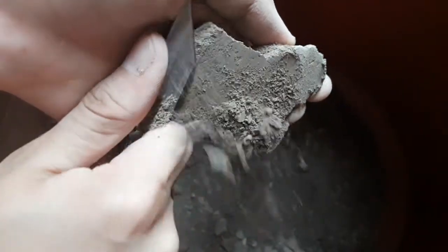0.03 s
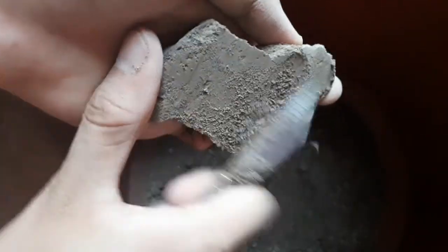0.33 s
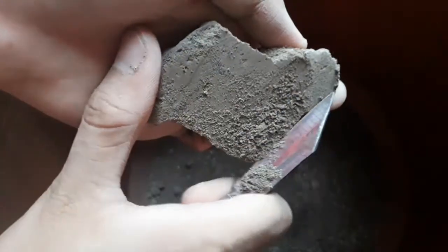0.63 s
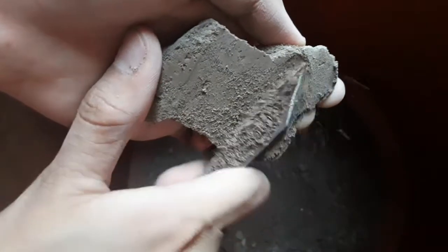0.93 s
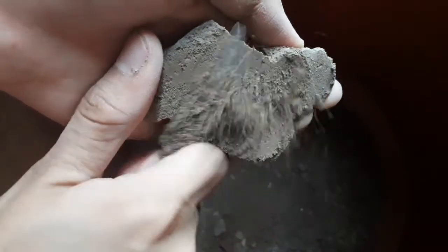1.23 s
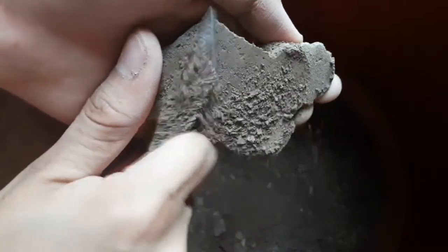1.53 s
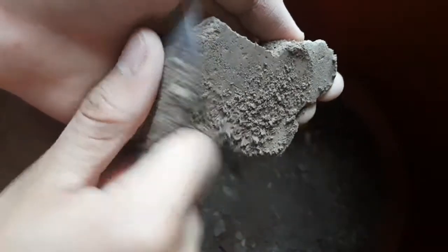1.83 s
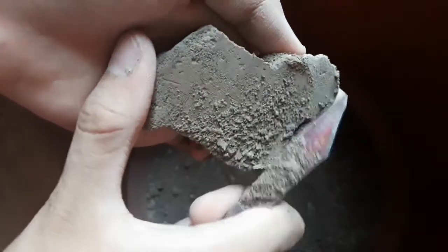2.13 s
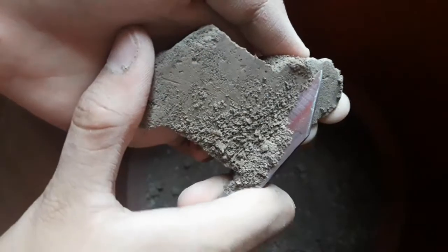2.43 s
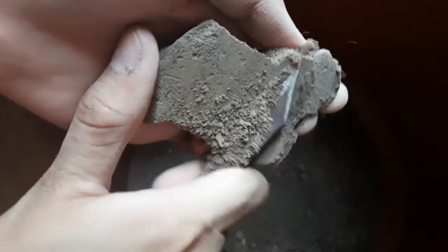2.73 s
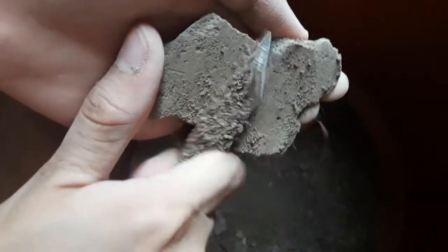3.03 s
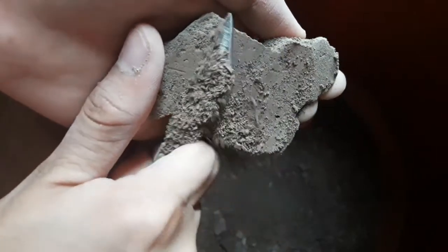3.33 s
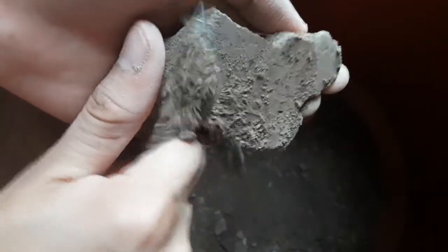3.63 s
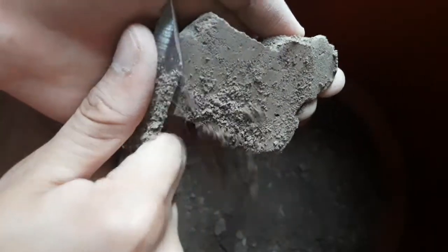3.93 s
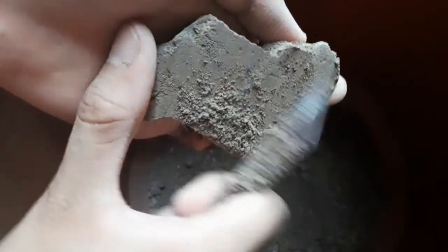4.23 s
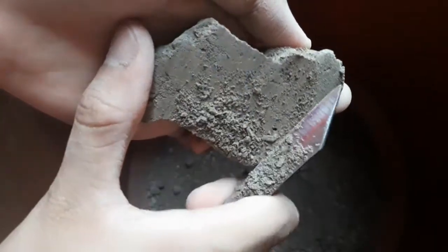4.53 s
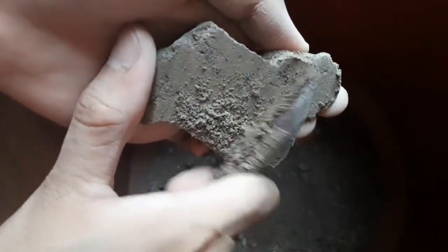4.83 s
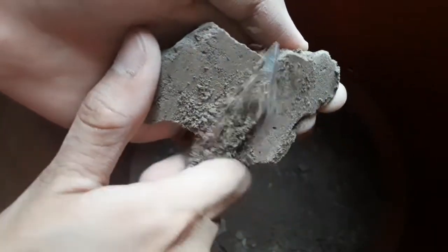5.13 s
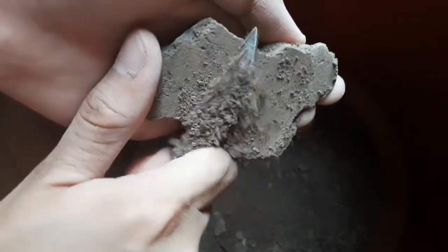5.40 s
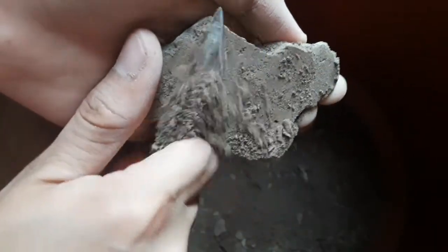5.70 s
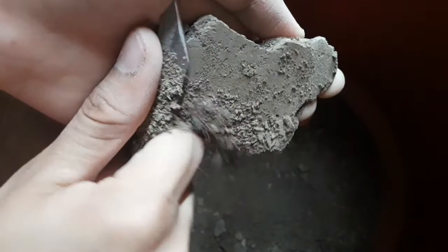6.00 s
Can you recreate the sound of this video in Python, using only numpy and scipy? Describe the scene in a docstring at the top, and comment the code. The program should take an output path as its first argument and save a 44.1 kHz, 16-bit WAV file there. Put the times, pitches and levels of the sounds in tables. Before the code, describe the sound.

A small steel blade works on a crumbly chunk of sand, heard close in a quiet room. At about 0.3 seconds the flat of the blade brushes across it, and lumps land in a bowl with crunchy thuds and a brief ring, loudest around 0.4 to 0.5 seconds. The first scraping stroke runs from about 0.6 to 1.7 seconds: short, gritty, hissing pushes with sharp bursts as the edge catches and slips, the steel ringing lightly in the later part. After a lull with one short scrape, a second stroke runs from 2.6 to 3.8 seconds, with crumbs rattling into the bowl near 3.2 seconds. A faint brush and soft hand bumps follow just after 4 seconds. The third stroke stutters from about 4.7 to 6 seconds. Throughout, the hands give a soft, low rumble and loose sand patters faintly into the bowl.

```python
"""Shaving a chunk of sand

A small steel blade shaves a crumbly chunk of sand, held in the hand over a bowl in a quiet room.
Three strokes advance in short pushes, shearing off countless grains that hiss and set the blade
ringing. The edge catches and slips in bursts, and between strokes the flat of the blade brushes back.
The hands rumble softly, and loose crumbs and lumps drop into the bowl below."""
import sys
import numpy as np
from scipy import signal
from scipy.fft import rfft, irfft, next_fast_len
from scipy.io import wavfile
from scipy.ndimage import uniform_filter1d

SR = 44100
rng = np.random.default_rng(int(sys.argv[2]) if len(sys.argv) > 2 else 0)


def inscribe(sig):
    """Save sig as 16-bit PCM at rate SR to the path in sys.argv[1].

    A 1-D sig is mono; a 2-D sig holds one channel per row.
    Samples are clipped to [-1, 1] before scaling.
    """
    pcm = np.round(np.clip(np.atleast_2d(sig).T, -1, 1) * 32767)
    wavfile.write(sys.argv[1], SR, pcm.astype(np.int16))


N = 271656
T = np.arange(N) / SR
FFT_SIZE = next_fast_len(N + SR // 2)
FREQS = np.arange(FFT_SIZE // 2 + 1) * SR / FFT_SIZE

# the flat of the blade brushes back (start [s], length [s], first level [dB], last level [dB])
BACK_BRUSHES = [(0.0, 0.078, -47.5, -53), (0.226, 0.051, -27, -30.5), (0.31, 0.043, -29.5, -27.5),
                (1.893, 0.01, -37, -39.5), (4.062, 0.025, -32, -29), (4.17, 0.018, -56, -43.5),
                (6.137, 0.012, -40.5, -42)]
# the edge breaks through a hard spot (time [s], level [dB], rise [s], fall [s])
EDGE_SLIPS = [(0.359, -17.5, 0.0044, 0.0041), (0.859, -12, 0.0049, 0.0083), (1.0582, -19.5, 0.006, 0.0069),
              (1.1646, -19, 0.0042, 0.017), (1.5077, -16, 0.0022, 0.0081), (1.648, -16.5, 0.0023, 0.02),
              (2.599, -27, 0.0078, 0.0096), (2.8476, -11.5, 0.0049, 0.01), (3.0237, -15, 0.0057, 0.014),
              (3.116, -17, 0.007, 0.01), (3.2312, -15, 0.0047, 0.0096), (3.4018, -17, 0.0053, 0.0043),
              (3.4732, -12.5, 0.0016, 0.0072), (3.6815, -24, 0.002, 0.012), (4.673, -29.5, 0.0086, 0.0033),
              (4.8245, -15, 0.012, 0.0086), (4.911, -14.5, 0.0026, 0.0083), (5.0316, -20.5, 0.009, 0.0084),
              (5.151, -15.5, 0.0033, 0.012), (5.3316, -13.5, 0.0021, 0.0056), (5.4532, -20, 0.005, 0.0049),
              (5.5435, -26, 0.0012, 0.0064), (5.6355, -14, 0.005, 0.013), (5.859, -16, 0.0023, 0.0087)]
# the blade crosses the chunk from its far edge to the thumb (start [s], end [s])
BLADE_STROKES = [(0.55, 1.74), (2.5, 3.54), (4.48, 6.0)]
# short pushes of the blade (start [s], length [s], first level [dB], last level [dB], brightness [dB])
BLADE_PUSHES = [(0.576, 0.033, -41.5, -40.5, 0.5), (0.764, 0.052, -27, -21, 1.5),
                (0.927, 0.059, -25, -23.5, 3.5), (1.107, 0.025, -33.5, -34.5, -0.5),
                (1.161, 0.08, -36, -17, 1.5), (1.281, 0.16, -18.5, -40, 3), (1.513, 0.1, -26.5, -29, 1.5),
                (1.654, 0.063, -21.5, -38, -1), (2.248, 0.069, -44.5, -48, 3),
                (2.332, 0.06, -26, -29.5, -0.5), (2.636, 0.043, -37, -25.5, 5),
                (2.685, 0.081, -27, -25.5, 5.5), (2.78, 0.067, -50, -25.5, -1),
                (2.864, 0.094, -28.5, -33.5, 0.5), (3.038, 0.04, -38, -29, 3.5),
                (3.126, 0.054, -32.5, -22, 0.5), (3.234, 0.052, -26.5, -22.5, 0.5),
                (3.418, 0.23, -31.5, -42.5, -1.5), (3.692, 0.07, -18.5, -17, -4),
                (3.83, 0.09, -39, -34.5, -4.5), (4.489, 0.058, -51.5, -40.5, -1.5),
                (4.695, 0.062, -35, -21, 2.5), (4.864, 0.065, -30.5, -18.5, 3.5),
                (5.047, 0.092, -38, -39.5, 3.5), (5.151, 0.097, -27.5, -33, 1),
                (5.32, 0.008, -40, -35, 3.5), (5.345, 0.039, -24, -31, 1), (5.458, 0.015, -27, -29, 3),
                (5.565, 0.063, -47.5, -29, 3), (5.638, 0.097, -22, -22, 2.5), (5.79, 0.034, -37, -31, -3),
                (5.871, 0.052, -24.5, -25.5, 2)]
# the blade rings more near the thumb (share of the stroke [0-1], ring compared with hiss [dB])
STROKE_RING = [(0, -31), (0.3, -28), (0.56, -5.5), (0.72, -11), (1, -3)]
# the notes the steel rings at (pitch [Hz], width [Hz], level [dB])
BLADE_NOTES = [(2520, 54, -19), (2470, 43, 13), (2682, 93, 8), (2917, 28, 6.5), (2980, 31, -19),
               (3723, 25, -3), (4156, 24, -3), (4700, 13, -13), (5686, 48, -9.5), (6950, 93, -10),
               (8126, 57, -4), (8780, 38, -5), (9200, 200, -12.5), (10030, 49, -3), (11750, 170, -7.5),
               (13200, 100, -8)]
# tone of the shearing grains (frequency [Hz], level [dB])
GRIT_TONE = [(400, -10), (750, -10.5), (1400, -6), (2000, 0.5), (2500, -1.5), (3300, 8.5), (5400, 7.5),
             (6600, -1.5), (9000, -0.5), (11000, -3), (13500, -5), (14500, -13), (15500, -44)]
# constant rumble of the hands holding the chunk (time [s], level [dB])
GRIP_LEVEL = [(0.12, -35.5), (0.6, -34.5), (1.1, -36.5), (1.75, -33.5), (2.35, -33), (2.78, -38.5),
              (2.9, -32.5), (3.6, -35.5), (4.4, -33.5), (4.65, -40.5), (5.0, -34), (5.25, -36), (5.8, -30),
              (6.04, -39.5)]
# the hands shift and shake sand loose (time [s], length [s], rumble [dB], patter [dB])
GRIP_SHIFTS = [(0.064, 0.026, -23, -40), (0.248, 0.015, -17, -31), (0.317, 0.054, -16.5, -52),
               (0.428, 0.12, -27, -34.5), (0.668, 0.036, -19, -37), (0.773, 0.019, -22, -30.5),
               (0.885, 0.012, -32, -44), (0.96, 0.014, -25.5, -33.5), (1.235, 0.025, -35, -25.5),
               (1.707, 0.089, -34.5, -38.5), (2.124, 0.062, -33, -39), (2.698, 0.025, -35, -38.5),
               (3.192, 0.046, -25.5, -31), (3.507, 0.17, -34.5, -36), (3.713, 0.1, -29.5, -34),
               (3.918, 0.051, -27.5, -41.5), (4.079, 0.022, -25.5, -31.5), (4.15, 0.075, -20.5, -33.5),
               (4.292, 0.074, -28.5, -33.5), (4.475, 0.073, -39, -40.5), (5.03, 0.018, -32, -51),
               (5.366, 0.046, -29, -43), (5.655, 0.032, -23.5, -36), (5.88, 0.1, -31, -38.5),
               (6.121, 0.042, -26, -37.5)]
# tone of the hands' rumble (frequency [Hz], level [dB])
RUMBLE_TONE = [(25, -42), (50, -33), (76, -7.5), (110, -7), (160, -3), (230, 9.5), (320, -3), (420, -13),
               (700, -17.5), (1500, -49)]
# the hollow of the bowl and cupped hands booms (pitch [Hz], width [Hz], level [dB])
HOLLOW_NOTES = [(204, 4, -15), (261, 8.9, 1), (285, 6.1, -8)]
# the notes the bowl's wall rings at (pitch [Hz], width [Hz], level [dB])
BOWL_NOTES = [(722.7, 10, 12), (924, 12, -3), (1155, 8.8, 7), (1550, 13, -22), (1980, 16, 2.5)]
# tone of trickling sand (frequency [Hz], level [dB])
PATTER_TONE = [(300, -14), (500, -4.5), (730, 3.5), (950, -1.5), (1200, -3.5), (1600, -10), (2400, -20),
               (5000, -28)]
# showers of crumbs land (time [s], level [dB], length [s])
CRUMB_SHOWERS = [(.258, -25.5, 0.028), (0.501, -37.5, 0.091), (0.534, -22, .024), (0.621, -44, 0.014),
                 (3.156, -24, 0.008), (3.174, -15, 0.012), (3.19, -24.5, 0.016), (3.417, -35, .012),
                 (3.607, -38, 0.028), (3.707, -34, 0.033), (3.853, -47.5, 0.21), (4.186, -68, .06),
                 (4.295, -41.5, .02)]
# tone of the landing crumbs (frequency [Hz], level [dB])
CRUMB_TONE = [(40, -15), (200, -1), (500, -10), (950, -1.5), (1400, 7), (2100, 2), (3000, -1), (4500, -7.5),
              (7000, -43), (15000, -45)]
# lumps land (time [s], crush [dB], contact [s], thud [dB], wall ring [dB], pitch of the spot hit [Hz])
LUMP_LANDINGS = [(.281, -42, 0.0043, -15, -24, 730), (0.327, -52, 0.011, -8, -41, 730),
                 (0.3635, -6, 0.005, -3, -14, 710), (0.479, -5.5, 0.0033, -7.5, -10.5, 1300),
                 (.488, -11.5, 0.005, -24, -24, 1370), (.645, -33.5, 0.026, -22.5, -29, 1100),
                 (0.667, -45, 0.0034, -11, -61, 710), (0.683, -61, 0.0054, -13, -49, 710),
                 (2.093, -50, 0.0036, -10, -35, 690), (2.345, -51, 0.013, -25, -29, 720),
                 (2.852, -39, 0.0036, -41, -28.5, 740)]
# tone of a lump being crushed (frequency [Hz], level [dB])
CRUSH_TONE = [(30, -45), (120, -42), (250, -13), (450, -20), (850, 8.5), (1400, -2.5), (2200, -10),
              (4000, -21), (8000, -39), (15000, -39)]
# tone of the room's faint background noise (frequency [Hz], level [dB])
AIR_TONE = [(25, -6), (80, 18), (250, -26), (600, -44), (1700, -17), (2600, -6), (4500, -6.5), (8000, -9),
            (13500, -12), (15500, -27)]
# how much sound scatters sideways (frequency [Hz], level [dB])
SIDE_TONE = [(100, -51), (270, -85), (420, -11.5), (700, -4), (1400, 4), (2600, -2.5), (4000, 1),
             (14000, 2.5)]


def from_db(db):
    """Turn decibels into a factor to multiply by."""
    return 10 ** (np.asarray(db) / 20)


def rms_one(x):
    """Scale a sound to an average (rms) level of 1."""
    return x / np.sqrt(np.mean(x ** 2) + 1e-20)


def steady(x, samples):
    """Hold the level near 1 over each stretch of samples, keeping the finer texture."""
    return x / np.sqrt(np.abs(uniform_filter1d(x ** 2, size=samples)) + 1e-12)


def drift(per_s):
    """A value that wanders by about 1 around zero, taking `per_s` random steps a second."""
    steps = rng.standard_normal(2000)
    return np.interp(T * per_s, np.arange(len(steps)), steps) * np.sqrt(3 / 2)


def coloured(x, tone):
    """Make each frequency louder or softer, as a tone table says."""
    hz, db = np.transpose(tone)
    gain = from_db(np.interp(np.log(FREQS + 1), np.log(hz), db))
    return irfft(rfft(x, FFT_SIZE) * gain, FFT_SIZE)[:N]


def resonance(x, hz, width):
    """Ring at one pitch; the smaller the width, the longer the ring."""
    r = np.exp(-np.pi * width / SR)
    feedback = [1, -2 * r * np.cos(2 * np.pi * hz / SR), r * r]
    return signal.lfilter(np.array([1, 0, -1]) * (1 - r * r) / 2, feedback, x + 1e-18)


def body(x, notes):
    """An object rings at all its notes at once."""
    return sum(from_db(db) * resonance(x, hz, width) for hz, width, db in notes)


def grains(per_s, spread_db):
    """Sand grains: clicks at random moments and of random size."""
    sizes = from_db(spread_db * np.minimum(rng.exponential(1, N), 4)) * rng.choice([-1, 1], N)
    return rms_one(sizes * (rng.random(N) < per_s / SR))


def swell(when, rise, fall):
    """A bell-shaped burst that peaks at `when`; all in seconds."""
    return np.exp(-np.minimum(((T - when) / np.where(T < when, rise, fall)) ** 2, 40))


def effort(moves, attack_s=0.0098, release_db_per_s=365):
    """Strength of brushes or pushes: each bites quickly, builds or eases evenly, then dies away."""
    power = np.zeros(N)
    for start, length, first_db, last_db, *_ in moves:
        bite = swell(start, attack_s, np.inf)
        held_db = np.interp(T, [start, start + length], [first_db, last_db])
        release_db = np.clip((T - start - length) * release_db_per_s, 0, 120)
        power += (bite * from_db(held_db - release_db)) ** 2
    return np.sqrt(power)


def blade_tone(flat_share, flat_ring_db=-13, flat_bright_db=-8):
    """Ring and brightness in dB: set by stroke and push, blended with the tone of the flat blade."""
    share, rings_db = np.transpose(STROKE_RING)
    times = np.concatenate([start + share * (end - start) for start, end in BLADE_STROKES])
    ring_db = np.interp(T, times, np.tile(rings_db, len(BLADE_STROKES)))
    start, length, _, _, brights_db = np.transpose(BLADE_PUSHES)
    bright_db = np.interp(T, start + length / 2, brights_db)
    return ((1 - flat_share) * ring_db + flat_share * flat_ring_db,
            (1 - flat_share) * bright_db + flat_share * flat_bright_db)


def near_echoes(x, depth=0.3, longest_s=0.007, count=12):
    """Tiny echoes through chunk, blade and hands colour the sound, changing as the blade travels."""
    lags = (rng.uniform(0.1, 1, count) * longest_s * SR).astype(int)
    return x + depth * sum(drift(11) * np.roll(x, lag) for lag in lags)


def band(x, low_hz, high_hz):
    """Keep one range of frequencies and even out its level."""
    bandpass = signal.butter(4, (low_hz, high_hz), "band", fs=SR, output="sos")
    return steady(signal.sosfiltfilt(bandpass, x), samples=1800)


def scraping(push, slip, blade_db=8, wander_db=4.5, flutter_db=1.5, rest_db=-59, dull_db=-12):
    """Shearing grains hiss and ring the blade; its notes come and go as the point of contact moves."""
    shear = grains(per_s=10000, spread_db=3.5)
    blade = sum(from_db(db + wander_db * drift(14)) * resonance(shear, hz, width)
                for hz, width, db in BLADE_NOTES)
    grit = coloured(near_echoes(shear + from_db(blade_db) * blade), GRIT_TONE)
    dull, ring = band(grit, 450, 2500), band(grit, 2200, 3150)
    middle, top = band(grit, 3000, 7400), band(grit, 6600, 18000)
    brush = effort(BACK_BRUSHES)
    contact = np.sqrt(push ** 2 + brush ** 2 + from_db(rest_db) ** 2)
    # the hiss flutters as the sand crumbles
    level = np.hypot(contact * from_db(flutter_db * drift(150)), from_db(-1) * slip)
    ring_db, bright_db = blade_tone(flat_share=brush ** 2 / (contact ** 2 + slip ** 2))
    bright = from_db(bright_db)
    # a blade laid flat sounds duller and rasps around one pitch
    rasp = from_db(-10 - 2.4 * bright_db) * resonance(middle, hz=4900, width=1350)
    middle = steady(middle + rasp, samples=1800)
    hiss = (middle + bright * top) / np.hypot(1, bright) + from_db(dull_db) * dull
    return level * (hiss + from_db(ring_db) * ring)


def hands(push, slip, hollow_db=5, patter_db=-4, unrest_db=2.6):
    """Soft bumps of the hands boom in the hollow; falling sand patters and rings the bowl."""
    # the hands are never quite still and let sand trickle; pushes and slips shed more
    grip_db = np.interp(T, *np.transpose(GRIP_LEVEL))
    push_power = (from_db(-17) * push) ** 2
    rumble_power = from_db(grip_db + unrest_db * drift(14)) ** 2 + push_power
    sand_power = from_db(grip_db - 16) ** 2 + push_power + (from_db(-13) * slip) ** 2
    for when, length, rumble_db, sand_db in GRIP_SHIFTS:
        shift = swell(when, length, 1.07 * length)
        rumble_power += (from_db(rumble_db) * shift) ** 2
        sand_power += (from_db(sand_db) * shift) ** 2
    bumps, falling = grains(per_s=1500, spread_db=2.5), grains(per_s=1500, spread_db=0.5)
    boom = from_db(hollow_db) * body(bumps, HOLLOW_NOTES)
    rumble = steady(coloured(bumps, RUMBLE_TONE) + boom, samples=2000)
    # sand lying on the bottom shortens the bowl's ring
    wall = sum(from_db(db - 1 + 5 * drift(12)) * resonance(falling, hz, 1.4 * width)
               for hz, width, db in BOWL_NOTES)
    patter = steady(coloured(falling + wall, PATTER_TONE), samples=4000)
    return np.sqrt(rumble_power) * rumble + from_db(patter_db) * np.sqrt(sand_power) * patter


def crumbs(bowl_db=-4):
    """Loose crumbs rattle down on the sand in the bowl."""
    falling = grains(per_s=6000, spread_db=2)
    flow = sum(from_db(db) * swell(when, 0.5 * length, length) for when, db, length in CRUMB_SHOWERS)
    rattle = falling + from_db(bowl_db) * body(falling, BOWL_NOTES)
    return flow * steady(coloured(rattle, CRUMB_TONE), samples=900)


def lumps(thud_hz=262, tap_db=48, db_per_octave=-12):
    """A lump is crushed as it lands, thumps the bottom of the bowl and leaves its wall ringing."""
    crush, thud, wall = np.zeros((3, N))
    for when, crush_db, contact, thud_db, _, _ in LUMP_LANDINGS:
        crush += from_db(crush_db) * swell(when, 0.43 * contact, 1.06 * contact)
        # the soft landing lets the bottom's low note build up gradually
        low_note = np.sin(2 * np.pi * thud_hz * (T - when))
        thud += from_db(thud_db) * swell(when, contact, 2 * contact) * low_note
    crunch = steady(coloured(rng.standard_normal(N), CRUSH_TONE), samples=300)
    times, _, _, _, wall_db, spot_hz = np.transpose(LUMP_LANDINGS)
    for hz, width, db in BOWL_NOTES:
        # the spot that is hit favours the notes near its own pitch
        octaves_away = np.abs(np.log2(hz / spot_hz))
        taps = np.zeros(N)
        taps[(times * SR).astype(int)] = from_db(wall_db + tap_db + db + db_per_octave * octaves_away)
        wall += resonance(taps, hz, width)
    soft_wall = signal.sosfilt(signal.butter(2, 2500, fs=SR, output="sos"), wall)
    return from_db(-2) * crush * crunch + thud + soft_wall


def slipping(trail_share=0.42):
    """Strength of the slips: a short burst each, then a fading trail of loosened grains."""
    power = np.zeros(N)
    for when, db, rise, fall in EDGE_SLIPS:
        trail_s = 19 * fall
        trail = (T >= when) * from_db(-60 * np.abs(T - when) / trail_s)
        burst = (1 - trail_share) * swell(when, rise, fall) + trail_share * trail
        power += (from_db(db) * burst) ** 2
    return np.sqrt(power)


def room_echo(x, fade_s=0.12, delay_s=0.0056):
    """The room's many reflections blur into a short tail that drops 60 dB in `fade_s`."""
    t = T[:SR // 2]
    tail = rng.standard_normal(len(t)) * from_db(-60 * t / fade_s) * (t > delay_s)
    return signal.fftconvolve(x, tail / np.sqrt(np.sum(tail ** 2)))[:N]


def scene(room_db=-21, air_db=-49, narrowing_db=-31.5):
    """Close sounds in a quiet room: soft ones spread wide, loud ones stand in the centre."""
    push, slip = effort(BLADE_PUSHES), slipping()
    direct = scraping(push, slip) + hands(push, slip) + lumps() + crumbs()
    mid = direct + from_db(room_db) * room_echo(direct)
    mid += from_db(air_db) * rms_one(coloured(rng.standard_normal(N), AIR_TONE))
    # a copy shifted by a quarter wave makes the timing between left and right flit about
    scattered = signal.hilbert(coloured(mid, SIDE_TONE), FFT_SIZE).imag[:N]
    loudness = np.sqrt(np.abs(uniform_filter1d(scattered ** 2, size=700)))
    side = scattered * drift(240) / (1 + loudness / from_db(narrowing_db))
    return np.array([mid + side, mid - side])


def record(dry, cutoff_hz=15700):
    """The loudest peaks overload, and the highest treble is cut."""
    lowpass = signal.ellip(10, 0.1, 90, cutoff_hz, fs=SR, output="sos")
    return signal.sosfilt(lowpass, np.clip(dry, -1, 1))


dry = scene()
out = record(dry)
inscribe(out)
```